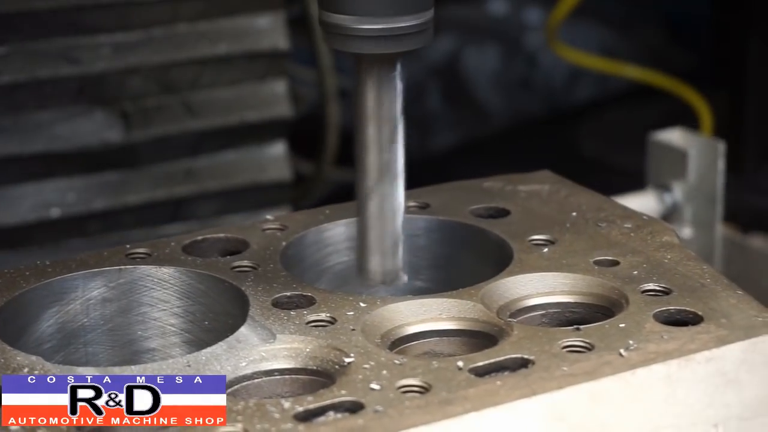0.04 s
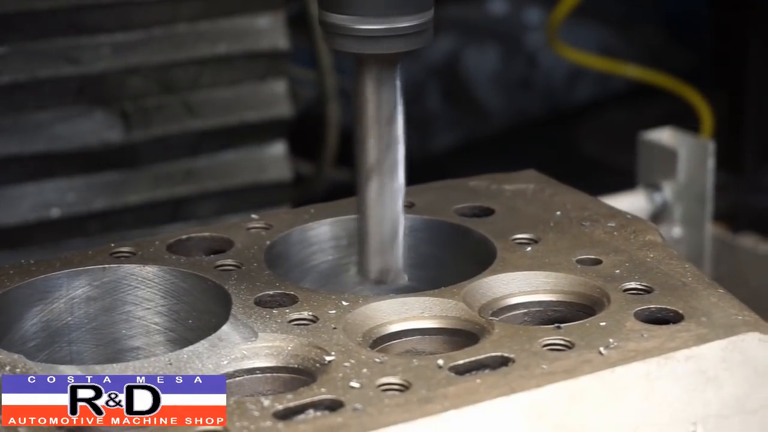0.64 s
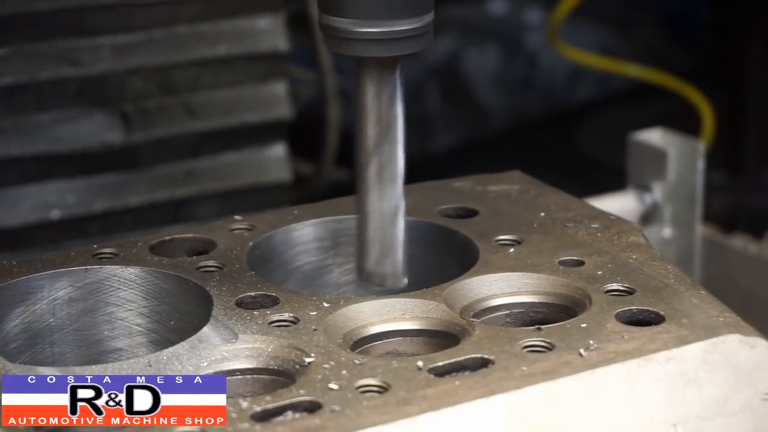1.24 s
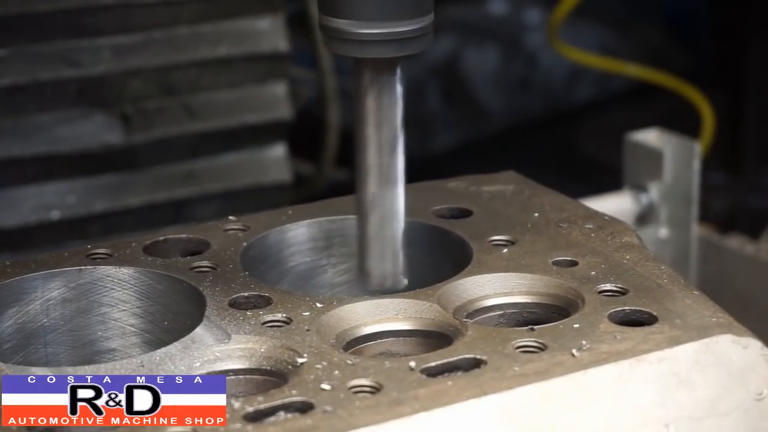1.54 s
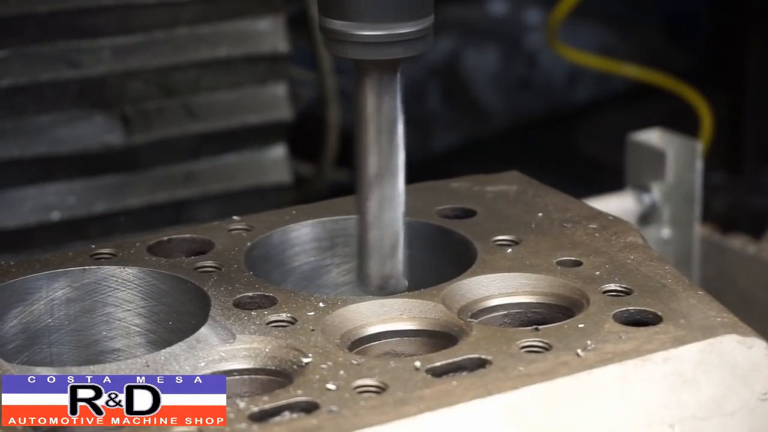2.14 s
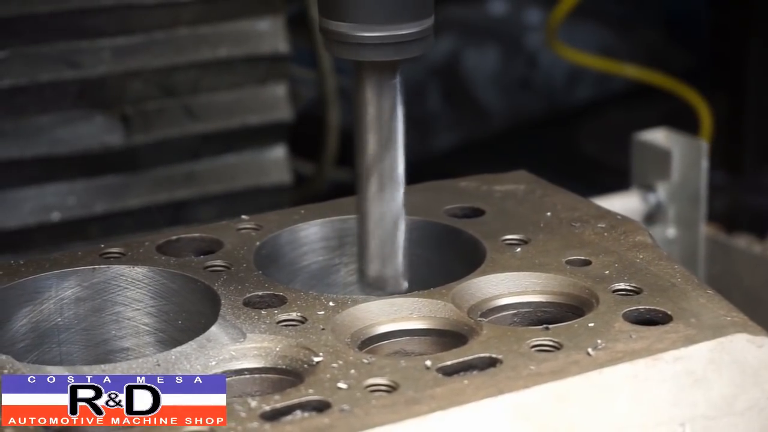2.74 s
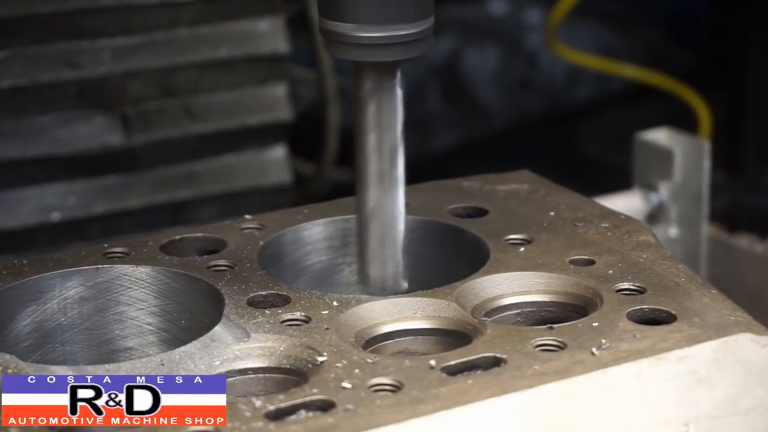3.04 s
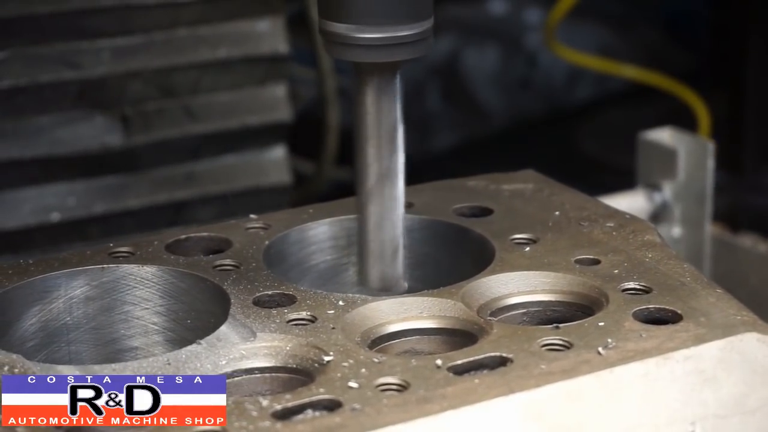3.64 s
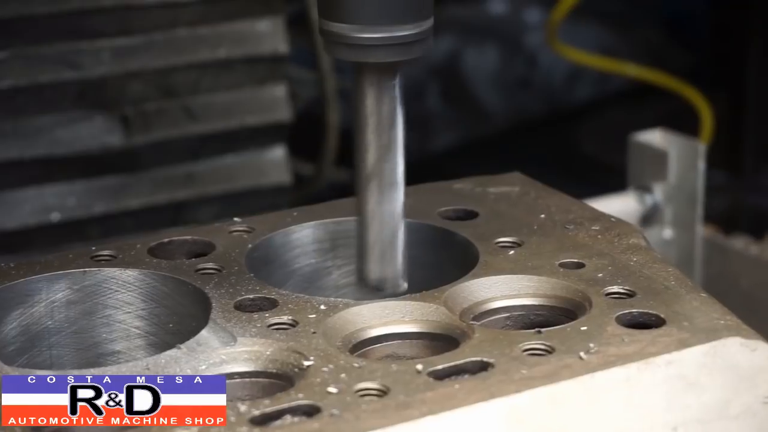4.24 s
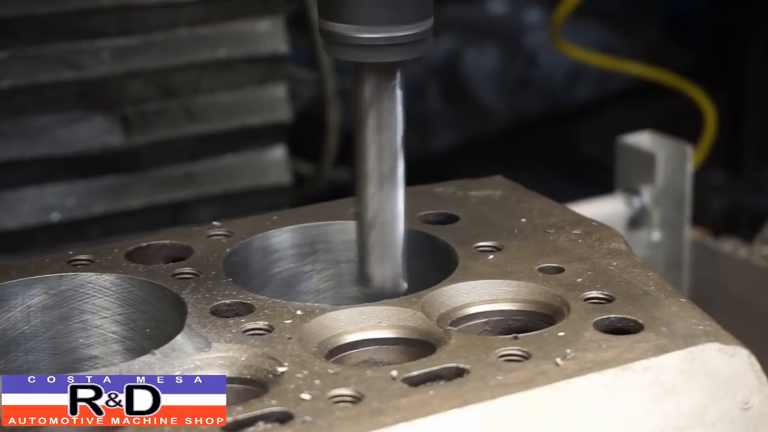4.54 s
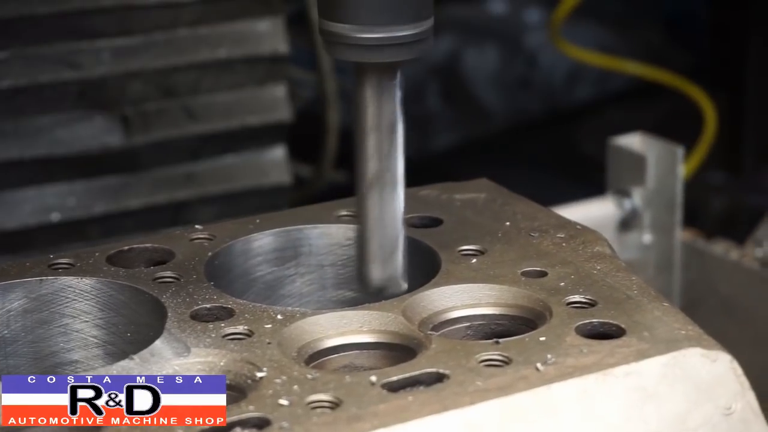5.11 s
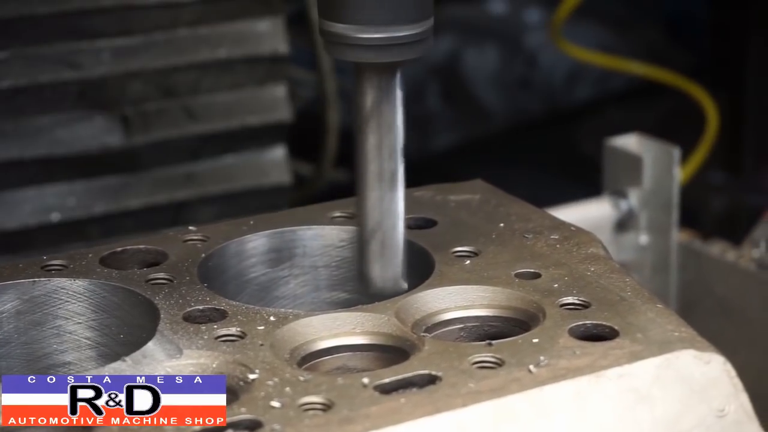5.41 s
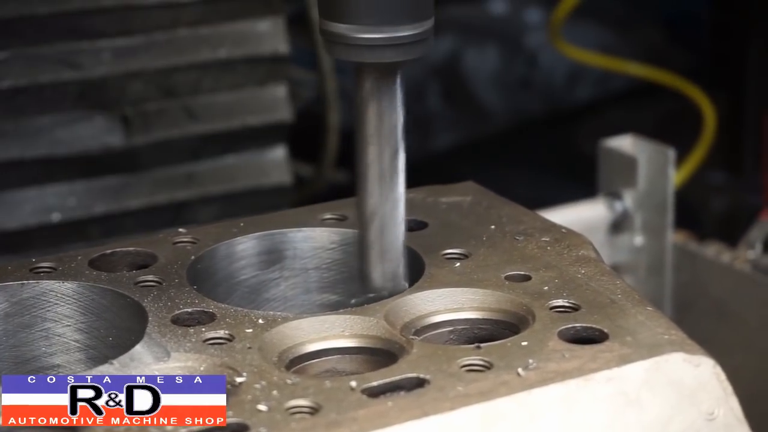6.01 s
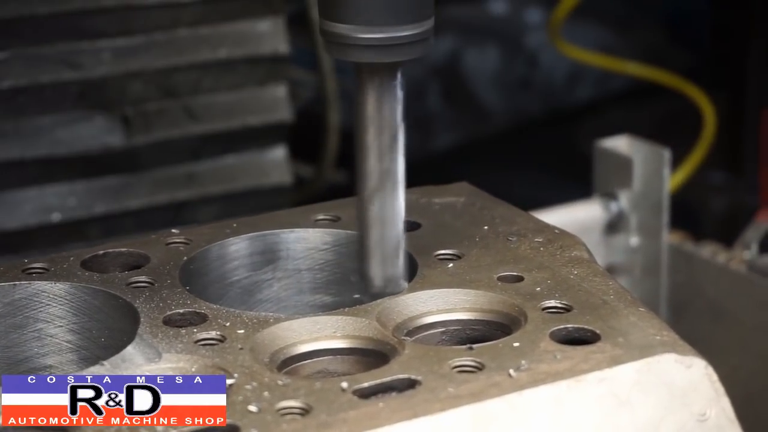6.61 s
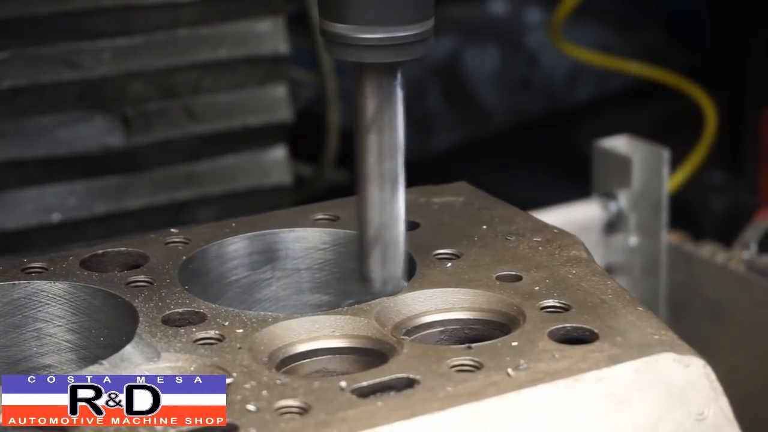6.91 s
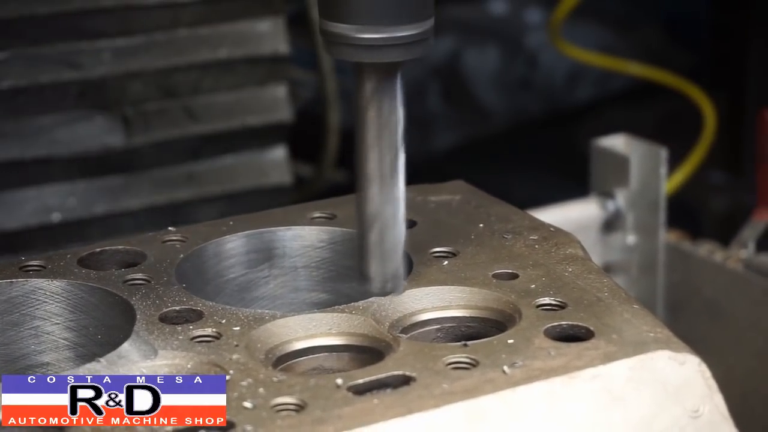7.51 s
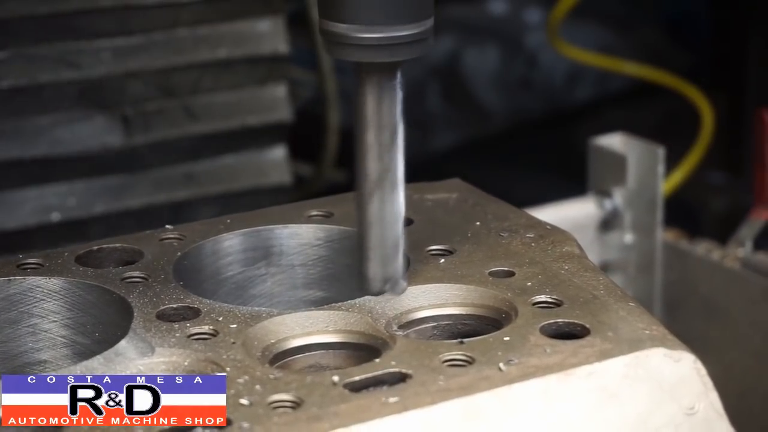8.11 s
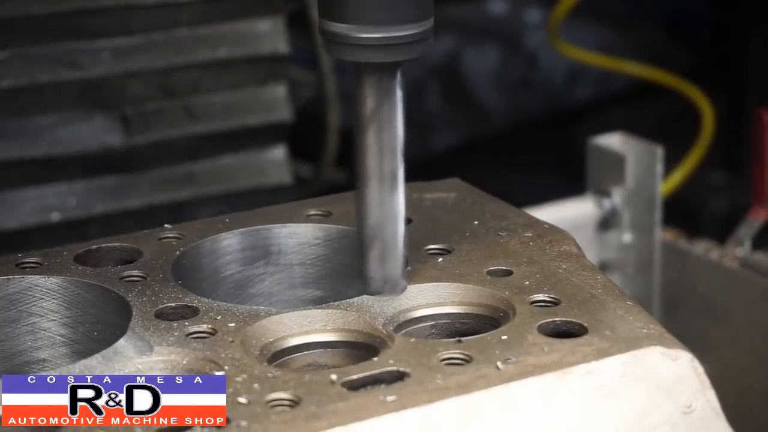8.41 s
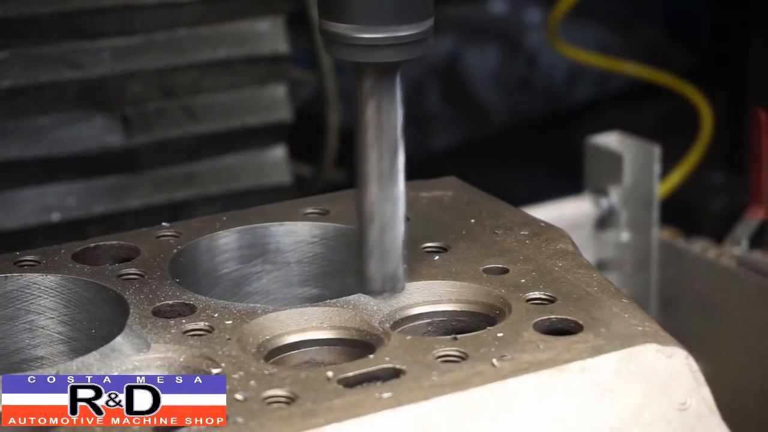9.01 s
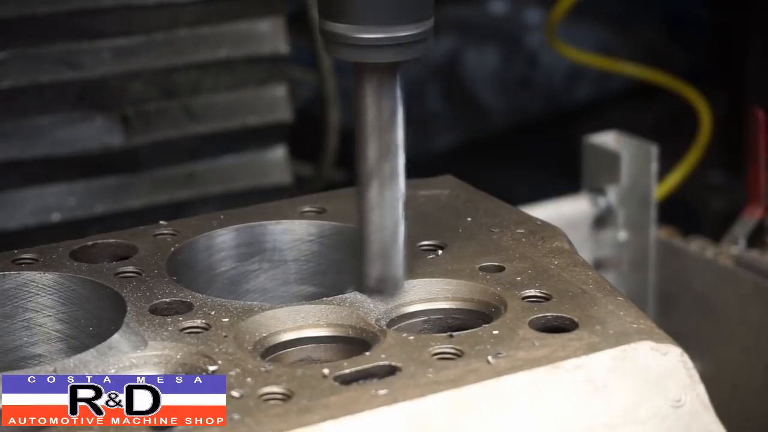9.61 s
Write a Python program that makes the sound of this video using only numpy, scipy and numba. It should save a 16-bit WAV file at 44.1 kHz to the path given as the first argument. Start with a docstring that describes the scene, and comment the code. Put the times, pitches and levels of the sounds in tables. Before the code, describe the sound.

A milling machine spindle runs with a steady whine, a rushing hiss and a thin high tone. The cutter lightly brushes a cast-iron engine block, then bites in with a rapid, gritty, ringing rattle for about two seconds. The cutting stops and the table motor's hum swells. A longer, harsher cut follows, with a squealing edge, pushing the whine into the background. It sounds close, with a short metal cabinet echo.

```python
"""A milling machine cuts reliefs beside a bore of a cast-iron engine block. The spindle drive whines, its
inverter sings and the edge brushes the bore. The table feeds in, and from 1.5 s the edge bites once a
turn, crumbling chips that ring block and tool; the block chatters, a chip pings, and at 2.4 s the level
dips briefly. At 3.7 s the cut ends and the table feeds across; a second cut runs from 5.9 s to the end.
The camera's gain control ducks the machine under each cut and creeps back up."""
import sys
import numpy as np
from scipy import signal
from scipy.fft import rfft, irfft
from scipy.io import wavfile
from scipy.ndimage import uniform_filter1d, minimum_filter1d
from numba import njit

SR = 44100
rng = np.random.default_rng(int(sys.argv[2]) if len(sys.argv) > 2 else 0)


def unload_audio(sound):
    """Save the sound as a 16-bit wav file, at the path given as the first command line argument."""
    columns = np.transpose(np.atleast_2d(sound))
    # keep every value between -1 and 1, then stretch to whole-number steps
    steps = np.round(np.clip(columns, -1, 1) * 32767)
    wavfile.write(sys.argv[1], SR, steps.astype(np.int16))


N = 429975
T = np.arange(N) / SR
FREQ = np.arange(N // 2 + 1) * SR / N

# Stereo spread. Each row: frequency in Hz, side level against mid in dB.
STEREO_WIDTH = [(60, -8), (110, -3.5), (200, -16), (600, -12), (1200, -12.5), (2200, -10), (3600, -4.5),
                (6500, -2.5), (11000, -2)]
# The drive train's rush. Each row: frequency in Hz, relative level in dB.
RUSH_SPECTRUM = [(25, -116), (60, -101), (120, -91), (190, -72.5), (300, -63.5), (600, -61.5),
                 (1000, -62.5), (2000, -60.5), (3200, -69.5), (4400, -71), (6200, -77), (8600, -76.5),
                 (10000, -73.5), (10900, -72)]
# Ring of the drive housing. Each row: pitch in Hz, bandwidth in Hz, relative level in dB.
HOUSING_MODES = [(257.5, 25, -56.5), (453, 37, -59), (1518, 240, -58), (1567, 190, -57.5), (2836, 91, -57)]
# Whine of bearings and gears. Each row: pitch in Hz, level in dB.
BEARING_TONES = [(444, -40.5), (554.5, -41.5), (646.0, -42), (748.3, -41.5), (829.0, -38), (931.3, -36.5),
                 (1106, -38), (1238, -41.5), (1303, -39), (1394, -38), (1486, -33), (1663, -38),
                 (1857, -45), (1938, -52), (2218, -41.5), (2412, -42), (2492, -43.5), (2692, -41),
                 (2778, -41.5), (2875, -37.5), (2966, -37.5), (3009, -43), (3435, -43.5), (4167, -44.5),
                 (4350, -51)]
# The inverter's switching sidebands. Each row: pitch in Hz, relative level in dB.
INVERTER_TONES = [(6923, -54), (7327, -56), (7379, -47.5), (7429, -47.5), (7479, -50.5), (7581, -44),
                  (7634, -54), (7682, -50), (7784, -54), (8140, -58.5)]
# Rasp of the edge brushing the bore. Each row: frequency in Hz, gain in dB.
SKIM_SPECTRUM = [(100, -18), (300, 5.5), (1000, 11), (2000, -10), (4500, 4), (6500, -1.5), (9000, 0.5),
                 (11000, 0)]
# Swells of the upper drive whine. Each row: peak time in seconds, half length in seconds, level in dB.
WHINE_SURGES = [(1.256, 0.35, -34.5), (4.544, .08, -30), (4.89, 0.083, -29.5)]
# The table's runs up to each cut. Each row: time of top speed in seconds, run-up in seconds,
# main tone level in dB, upper tone level in dB.
TABLE_FEEDS = [(1.45, .55, -38, -27), (5.85, 1.64, -25.5, -27.5)]
# Walls the edge meets once a turn; the last two close in on each other and merge.
# Each row: start, end, time of widest arc and run-in, all in seconds, angle at first touch in turns,
# drift in turns per second, widest arc in turns, then relative force, scrape and knock levels in dB.
WALL_CUTS = [(1.53, 3.69, 3.1, 0.077, 0.493, 0.16, 0.45, -13, -19.5, -11.5),
             (5.88, 10, 7.36, 0.044, 0.51, -0.11, 0.5, -10.5, -16, -14.5),
             (6.55, 10, 8.08, 0.92, -0.266, 0.075, 0.28, -9.5, -17, -7)]
# Ring of the iron block. Each row: pitch in Hz, bandwidth in Hz, relative level in dB.
BLOCK_MODES = [(787, 226, -8), (857, 80, -2), (933, 49, -2.5), (1096, 28, 0), (1233, 100, -1.5),
               (1176, 60, 1.5), (1270, 97, -2), (1450, 133, -9.5), (1424, 130, -8), (1570, 156, -2),
               (1806, 410, -15), (2102, 41, -4), (2420, 57, -27), (2670, 120, -15.5), (2960, 210, -40)]
# Ring of the tool. Each row: pitch in Hz, bandwidth in Hz, relative level in dB.
TOOL_MODES = [(3462, 160, 5), (3725, 17, 9), (4080, 33, 4.5), (4510, 250, -1), (4970, 430, -2),
              (5600, 124, 3), (5900, 350, -3.5), (6650, 130, -4), (7700, 62, 1), (9324, 510, -4),
              (10000, 230, 0), (10760, 220, -6)]
# Broad scrape under the tool's ring. Each row: frequency in Hz, relative level in dB.
SCRAPE_SPECTRUM = [(300, -34), (1500, -1), (2800, 5), (3200, -6.5), (6500, -4), (7200, -8), (11000, -17)]
# Squealing bending modes of the edge. Each row: pitch in Hz, bandwidth in Hz, relative level in dB.
EDGE_MODES = [(8543, 170, 5), (9010, 230, 2.5)]
# Low sway of the machine table. Each row: pitch in Hz, bandwidth in Hz, gain in dB.
SWAY_MODES = [(75.4, 8, -30), (185, 50, -44)]


def undb(db):
    """Decibels to gain."""
    return 10 ** (np.asarray(db) / 20)


def slope(points, hz):
    """Gain of a (Hz, dB) curve at the given frequencies."""
    corner_hz, db = np.transpose(points)
    return undb(np.interp(np.log(hz + 1), np.log(corner_hz), db))


def resonances(modes):
    """Gain of overlapping modes, summed in power; the skirts fall away an octave or so from each."""
    power = 0
    for hz, width, db in modes:
        peak = undb(2 * db) / (1 + ((FREQ - hz) * 2 / width) ** 2)
        power += peak / (1 + np.log2((FREQ + 1) / hz) ** 2) ** 2
    return np.sqrt(power)


def colour(x, gain):
    """Minimum-phase filter, so that resonances ring after each blow."""
    cepstrum = irfft(np.log(gain + 1e-9), N)
    fold = np.where(np.arange(N) < N // 2, 2., 0.)
    fold[0] = 1
    response = irfft(np.exp(rfft(cepstrum * fold)), N)[:4096]
    return signal.fftconvolve(x, response[None], axes=1)[:, :N]


def stereo(pair, gain, side_db=0):
    """Colours two unrelated signals as mid and side; the treble spreads wider than the midrange."""
    mid = colour(pair[:1], gain)
    side = colour(pair[1:], gain * slope(STEREO_WIDTH, FREQ)) * undb(side_db)
    return np.vstack([mid + side, mid - side])


def unit_power(gain):
    """Scales a filter so that it keeps the power of white noise."""
    return gain / np.sqrt(np.mean(gain ** 2))


def wander(rate):
    """Random drift with a spread near 1, gliding to a new value `rate` times a second."""
    return 1.2 * np.interp(T * rate, np.arange(4000), rng.standard_normal(4000))


def ramp(start, length):
    """A straight fade-in, 0-1."""
    return np.clip((T - start) / length, 0, 1)


def swell(peak, half_length):
    """A smooth rise and fall, 0-1."""
    return np.exp(-((T - peak) / half_length) ** 2)


def hiss():
    """Two white noises of 0 dB per Hz."""
    return rng.standard_normal((2, N)) * np.sqrt(SR / 2)


def tone(hz, db, rough, flutter_hz):
    """A machine tone that wavers in level and phase, with left and right out of step."""
    flutter = 1 + rough * wander(flutter_hz) + 1j * rough * wander(flutter_hz)
    wave = flutter * np.exp(1j * (2 * np.pi * hz * T + rng.uniform(0, 2 * np.pi)))
    mid = wave.imag
    side = slope(STEREO_WIDTH, hz) * wave.real * rng.choice([-1, 1])
    return np.array([mid + side, mid - side]) * undb(db) * np.sqrt(2 / (1 + 2 * rough ** 2))


def engaged(start, end, run_in, run_out=0.039):
    """How far the edge is into a wall, 0-1."""
    return ramp(start, run_in) * (1 - ramp(end - run_out, run_out))


def table_speed(fastest, run_up, slowing_s=0.43):
    """The table gathers speed smoothly, then slows as the cutter meets the iron; 0-1."""
    rise = np.sin(np.pi / 2 * ramp(fastest - run_up, run_up)) ** 2
    return rise * np.exp(-np.maximum(T - fastest, 0) / slowing_s)


def gear_whine(hz=2125.4, throb_hz=12.65, settle_s=0.58):
    """The gear throbs against a weaker sideband; a cut's load quiets it, the long traverse lifts it."""
    load = np.max([engaged(start, end + settle_s / 2, settle_s) for start, end, *_ in WALL_CUTS], axis=0)
    traverse = np.sqrt(table_speed(*TABLE_FEEDS[-1][:2]))
    db = -30 - 5 * load + 4.5 * traverse
    whine = tone(hz, db, rough=0.51, flutter_hz=54.9)
    return whine + tone(hz + throb_hz, db - 5, rough=0.38, flutter_hz=31.1)


def spindle():
    """The bed: a rushing drive train, rough bearings, the gear whine and the inverter's clean song."""
    rush_gain = np.hypot(slope(RUSH_SPECTRUM, FREQ), resonances(HOUSING_MODES))
    rush = stereo(hiss() * undb(1.37 * wander(60)), rush_gain, side_db=0.98)
    bearings = sum(tone(hz, db, rough=1.0, flutter_hz=22 + hz / 130) for hz, db in BEARING_TONES)
    gear = gear_whine()
    inverter = sum(tone(hz, db, rough=0.24, flutter_hz=21.9) for hz, db in INVERTER_TONES)
    return undb(1.2) * rush + bearings + gear + undb(5) * inverter


def skim(wave_hz=1.8, wave_db=4.5, crest_s=0.367, fade_s=0.22):
    """The edge brushes the bore in slow waves of fine rasp, fading out at the first bite."""
    waves = wave_db * np.cos(2 * np.pi * wave_hz * (T - crest_s))
    level = undb(-78.5 + waves + 0.74 * wander(150))
    fade = 1 - ramp(WALL_CUTS[0][0], fade_s)
    return stereo(hiss() * level * fade, slope(SKIM_SPECTRUM, FREQ))


def upper_whine(hz=2872, rest_db=-42):
    """The faint upper whine of the drive surges now and then."""
    level = undb(rest_db) + sum(undb(db) * swell(peak, half) for peak, half, db in WHINE_SURGES)
    return level * tone(hz, 0, rough=0.93, flutter_hz=33.5)


def feed_servo(main_hz=646.2, upper_hz=1583, creep_db=-46, upper_creep_db=-41):
    """The table's servo sings as it speeds across the bore, and hums on faintly while cutting."""
    main_level, upper_level = undb(creep_db), undb(upper_creep_db)
    for fastest, run_up, main_db, upper_db in TABLE_FEEDS:
        speed = table_speed(fastest, run_up)
        main_level = np.hypot(main_level, speed * undb(main_db))
        upper_level = np.hypot(upper_level, speed * undb(upper_db))
    main = main_level * tone(main_hz, 0, rough=0.12, flutter_hz=20)
    return main + upper_level * tone(upper_hz, 0, rough=1.0, flutter_hz=27.9)


def bite(cut, turn_hz=25.3, narrow_arc=0.13, entry_turns=0.085, exit_turns=0.2, knock_turns=0.09):
    """Once a turn the edge snaps into a wall and eases out: force, scrape, squeal and knock envelopes."""
    start, end, widest_at, run_in, angle, drift, widest_arc, force_db, scrape_db, knock_db = cut
    age = np.clip(T - start, 0, end - start)
    turns = turn_hz * T - angle - drift * age
    turn_index = np.round(turns).astype(int)
    offset = turns - turn_index
    # the arc in the iron opens and closes as the cutter passes through the wall
    arc = narrow_arc + (widest_arc - narrow_arc) * swell(widest_at, 1.5)
    inside = np.minimum((arc / 2 + offset) / entry_turns, (arc / 2 - offset) / exit_turns)
    cutting = engaged(start, end, run_in)
    contact = np.sqrt(np.clip(0.5 + inside, 0, 1)) * cutting
    load_db = 1.56 * age + 0.5 * wander(6.2)  # the bite deepens and meets hard spots
    depth, grip, place = rng.standard_normal((300, 3))[turn_index].T  # fresh every turn
    depth_db = 2 * depth + 0.66 * age * (-1.) ** turn_index  # deep and light bites come to alternate
    force = contact * undb(force_db + load_db + 0.4 * depth_db)
    scrape = contact * undb(scrape_db + 0.33 * age + 1.4 * grip)
    squeal = scrape * undb(1.2 * grip - 0.98 * depth_db)  # light bites squeal most
    break_at = arc * (0.053 + 0.25 * place)  # the biggest chip lets go near mid-arc
    pulse = np.exp(-((offset - break_at) / knock_turns) ** 2)
    knock = pulse * undb(knock_db + load_db + depth_db) * cutting
    return force, scrape, squeal, knock


def chips(rate, spread_db):
    """Brittle iron breaks off in a dense run of uneven snaps; power 1."""
    snaps = (rng.random((2, N)) < rate / SR) * rng.choice([-1, 1], (2, N))
    snaps = snaps * undb(spread_db * rng.standard_normal((2, N)))
    return snaps / snaps.std()


def cabinet(x, wet_db, t60):
    """The sheet-metal cabinet fills the gaps between bites with a short diffuse tail."""
    t = T[:SR // 2]
    tail = rng.standard_normal((2, len(t))) * np.exp(-np.log(1000) * t / t60) * np.minimum(t / 0.015, 1)
    tail *= undb(wet_db) / np.sqrt(np.sum(tail ** 2, axis=1, keepdims=True))
    return x + signal.fftconvolve(x, tail, axes=1)[:, :N]


def block_ring(force, lag_s=0.0008):
    """Crumbling chips ring the heavy block, which takes a moment to get going."""
    push = np.interp(T - lag_s, T, force)
    crumble = cabinet(push * chips(rate=7000, spread_db=1.5), wet_db=-4.8, t60=0.35)
    low_body = resonances([(208, 61, -8)])
    return stereo(crumble, np.hypot(unit_power(resonances(BLOCK_MODES)), low_body), side_db=0.8)


def shudder(knock, hz=1230, pitch_spread=0.065):
    """Each knock shakes the cutter for a few cycles."""
    pitch = hz * (1 + pitch_spread * wander(110))
    shake = knock * np.sin(2 * np.pi * np.cumsum(pitch) / SR)
    return cabinet(np.array([shake, shake]), wet_db=-4, t60=0.23)


def tool_ring(scrape, squeal):
    """The bright top, a touch to the left: chips ring the thin tool and set its edge squealing."""
    grit = cabinet(scrape * chips(rate=9000, spread_db=2.5), wet_db=-4, t60=0.217)
    tool_gain = unit_power(np.hypot(resonances(TOOL_MODES), slope(SCRAPE_SPECTRUM, FREQ)))
    tool = stereo(grit, tool_gain, side_db=1)
    edge_gain = unit_power(resonances(EDGE_MODES))
    edge = stereo(squeal * chips(rate=9000, spread_db=-1), edge_gain, side_db=-6)
    return (undb(-2.5) * tool + undb(-5.5) * edge) * undb([[0.7], [-0.7]])


def cutter():
    """The bites in all walls, summed in power, drive block and tool; their force sways the table."""
    bites = np.array([bite(cut) for cut in WALL_CUTS])
    force, scrape, squeal, knock = np.sqrt(np.sum(bites ** 2, axis=0))
    sway = colour(force[None], resonances(SWAY_MODES))
    return undb(-0.4) * block_ring(force) + shudder(knock) + tool_ring(scrape, squeal) + sway


def chatter(peak_s=1.72, half_length_s=0.15, hz=833, db=-22.5):
    """One mode of the block sings until the edge has settled into the first cut."""
    return swell(peak_s, half_length_s) * tone(hz, db, rough=1.0, flutter_hz=50.7)


def chip_ping(start_s=1.72, hz=2600, db=-14, t60=0.054):
    """A flung chip strikes the casting and rings briefly."""
    age = np.maximum(T - start_s, 0)
    envelope = ramp(start_s, 0.001) * np.exp(-np.log(1000) * age / t60)
    return undb(db) * envelope * np.sin(2 * np.pi * hz * age)


def scene():
    """The running machine and its cuts."""
    machine = spindle() + upper_whine() + feed_servo()
    return machine + skim() + cutter() + chatter() + chip_ping()


@njit
def follow(size, attack, release):
    """Level detector that rises fast and sinks slowly."""
    out, level = np.empty(len(size)), 0.
    for i in range(len(size)):
        level += (size[i] - level) * attack if size[i] > level else -level * release
        out[i] = level
    return out


def record(dry, ceiling_db=-13.5, attack_s=0.0048, release_s=3.47,
           peak_db=-6.5, peak_release_s=0.066, top_hz=11050):
    """The camera holds the level under a ceiling, recovers slowly, catches peaks and cuts the top."""
    rms = np.sqrt(np.abs(uniform_filter1d(np.mean(dry ** 2, axis=0), size=300)))
    held = follow(rms, 1 / (attack_s * SR), 1 / (release_s * SR))
    ducked = dry * np.minimum(1, undb(ceiling_db) / (held + 1e-9))
    peaks = follow(np.abs(ducked).max(axis=0), 1., 1 / (peak_release_s * SR))
    limiter = np.minimum(1, undb(peak_db) / (peaks + 1e-9))
    limiter = uniform_filter1d(minimum_filter1d(limiter, size=64), size=64)
    dip = undb(-7 * swell(2.4, 0.0085))  # the level dips briefly
    lowpass = signal.ellip(12, 0.2, 70, top_hz, fs=SR, output="sos")
    return signal.sosfilt(lowpass, ducked * limiter * dip)


dry = scene()
out = record(dry)
unload_audio(out)
```